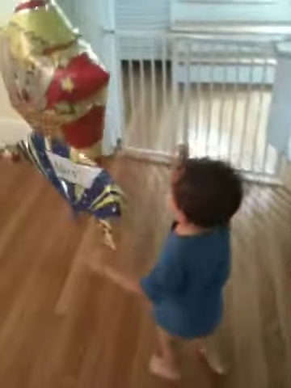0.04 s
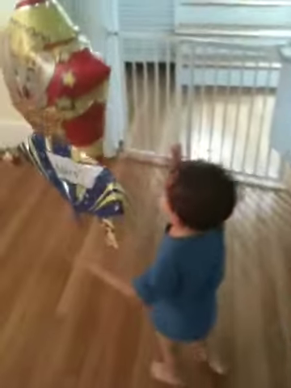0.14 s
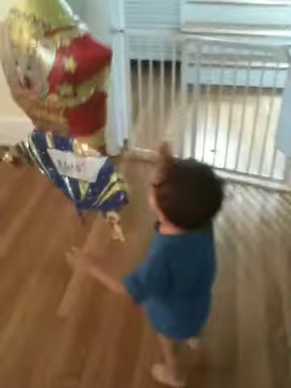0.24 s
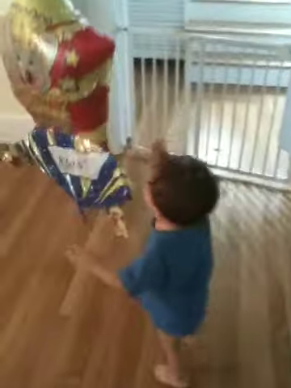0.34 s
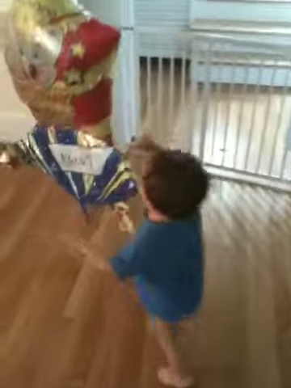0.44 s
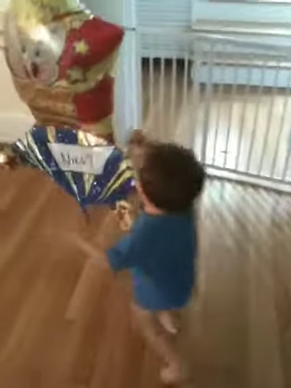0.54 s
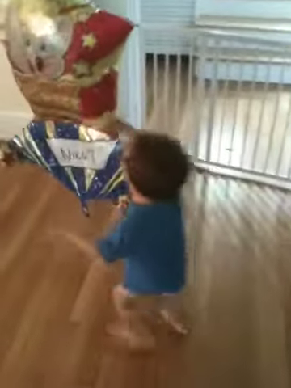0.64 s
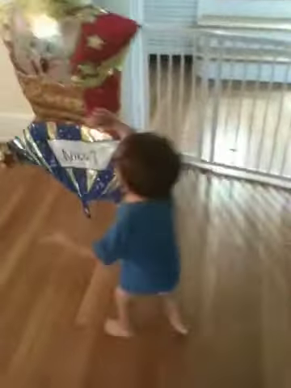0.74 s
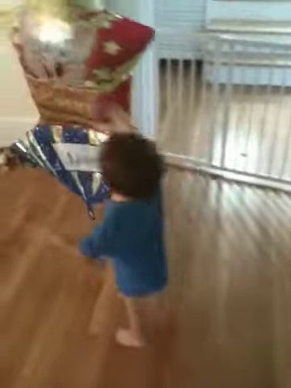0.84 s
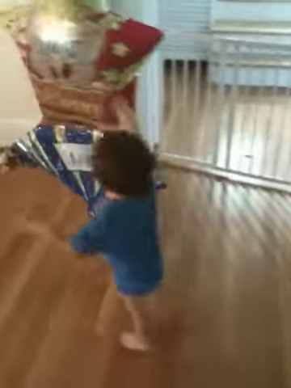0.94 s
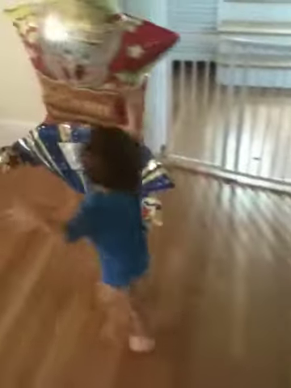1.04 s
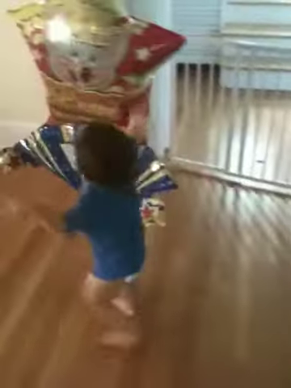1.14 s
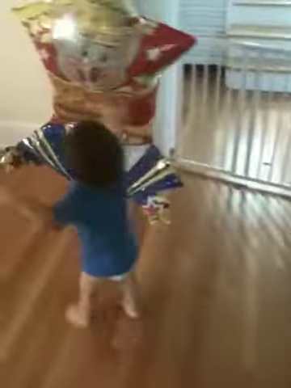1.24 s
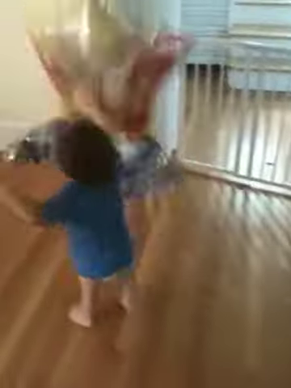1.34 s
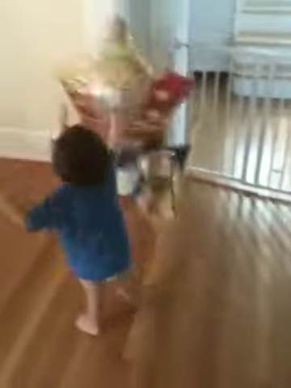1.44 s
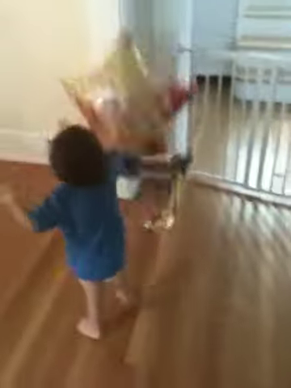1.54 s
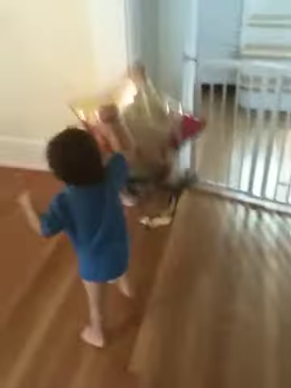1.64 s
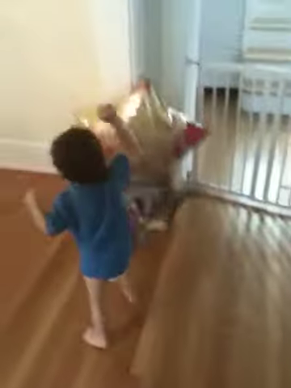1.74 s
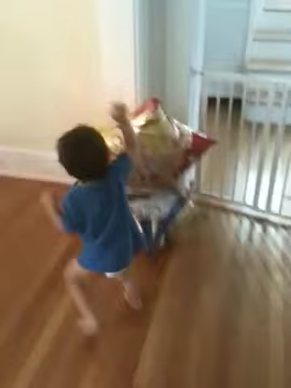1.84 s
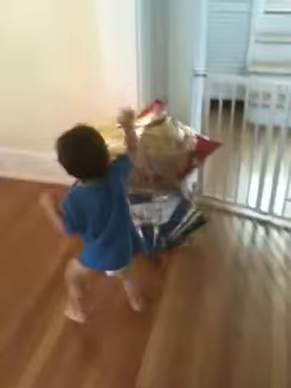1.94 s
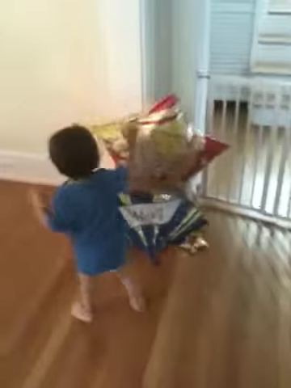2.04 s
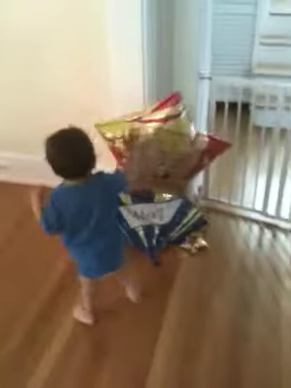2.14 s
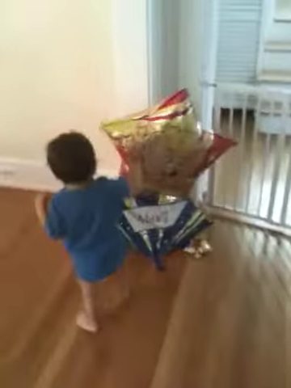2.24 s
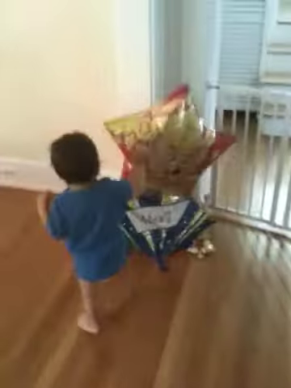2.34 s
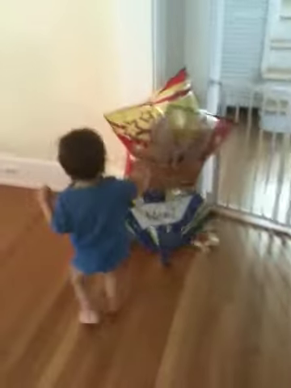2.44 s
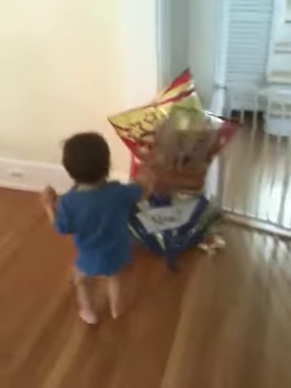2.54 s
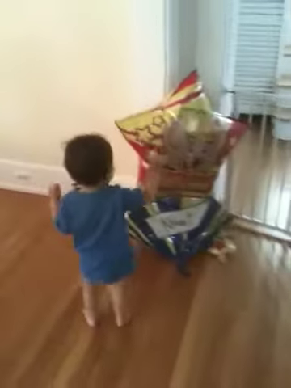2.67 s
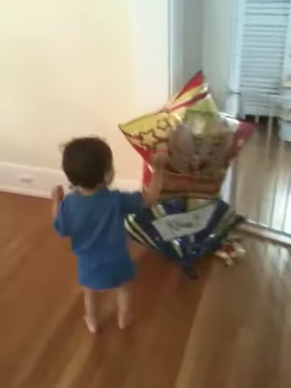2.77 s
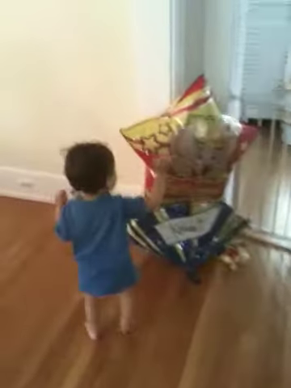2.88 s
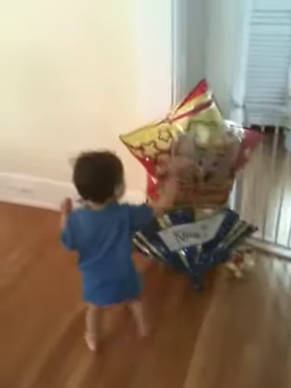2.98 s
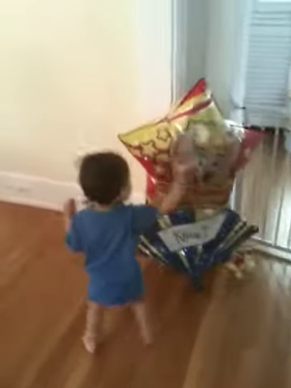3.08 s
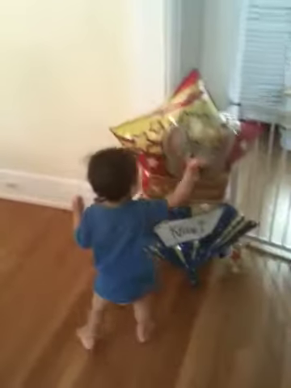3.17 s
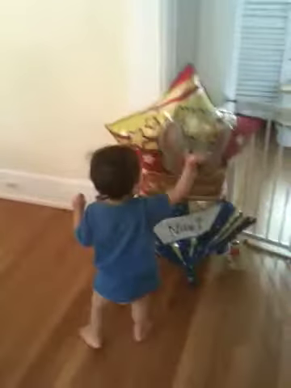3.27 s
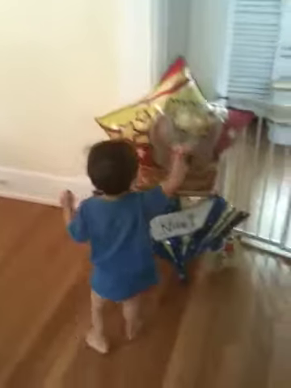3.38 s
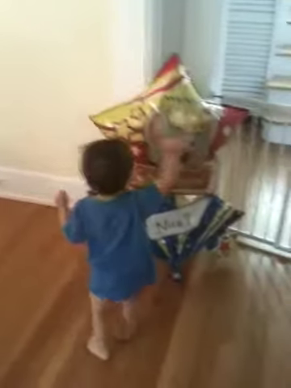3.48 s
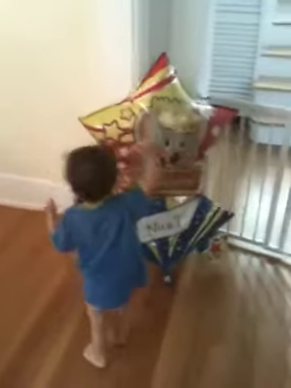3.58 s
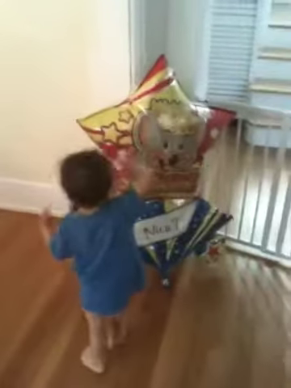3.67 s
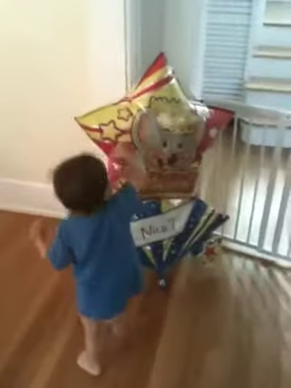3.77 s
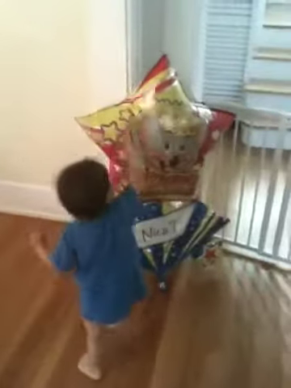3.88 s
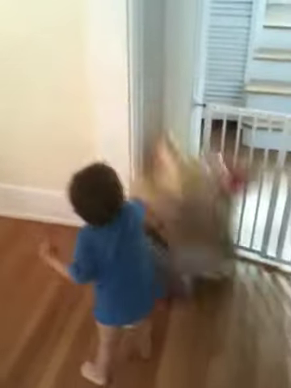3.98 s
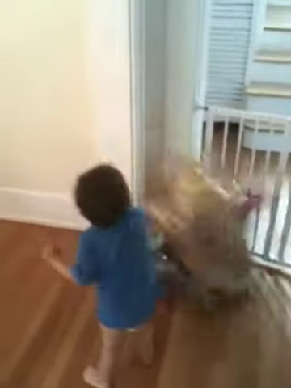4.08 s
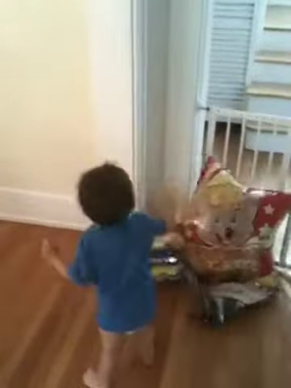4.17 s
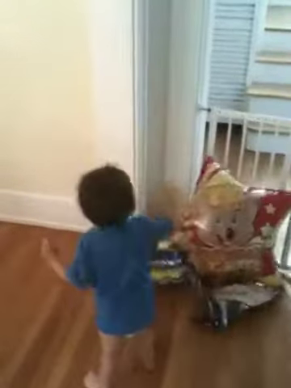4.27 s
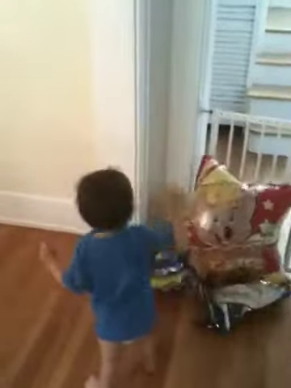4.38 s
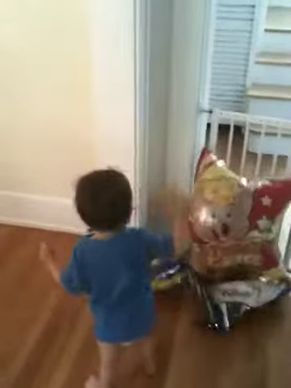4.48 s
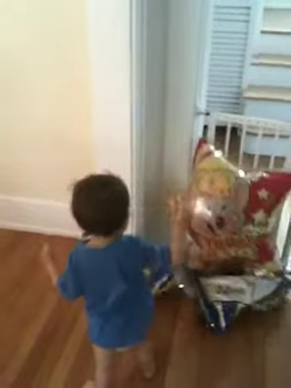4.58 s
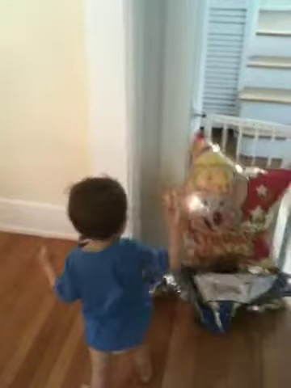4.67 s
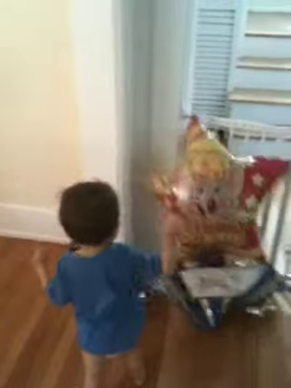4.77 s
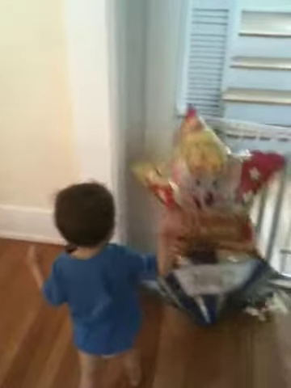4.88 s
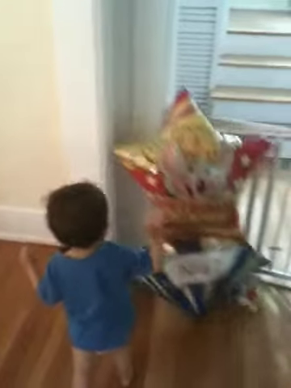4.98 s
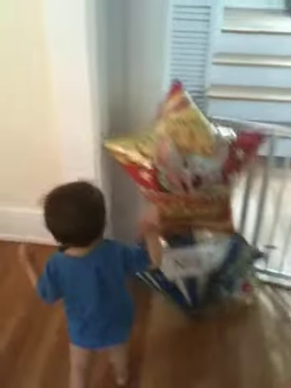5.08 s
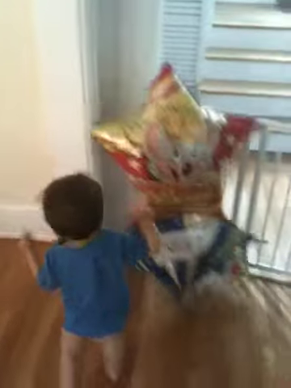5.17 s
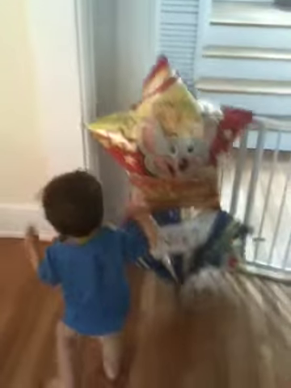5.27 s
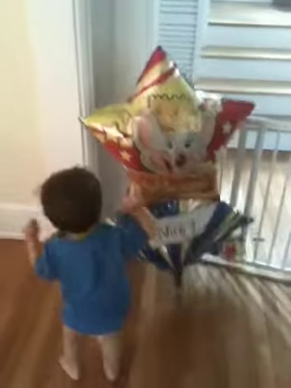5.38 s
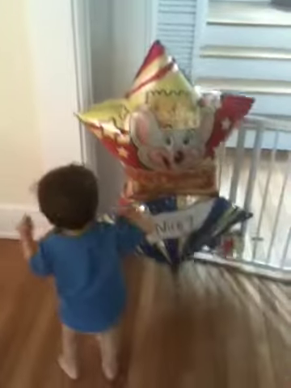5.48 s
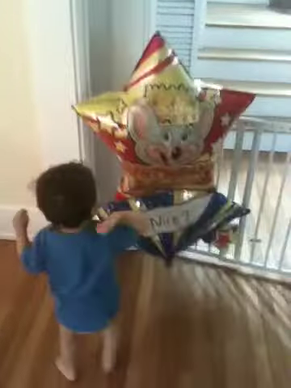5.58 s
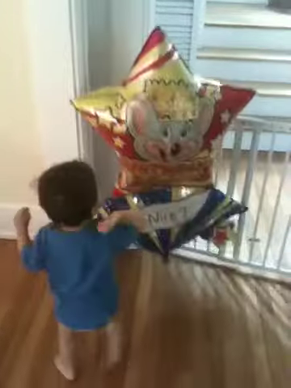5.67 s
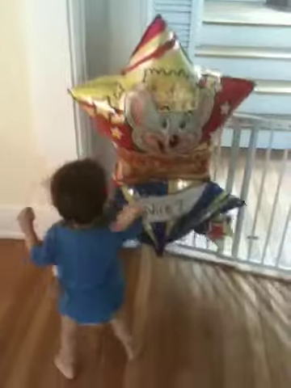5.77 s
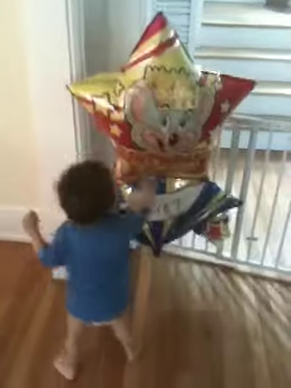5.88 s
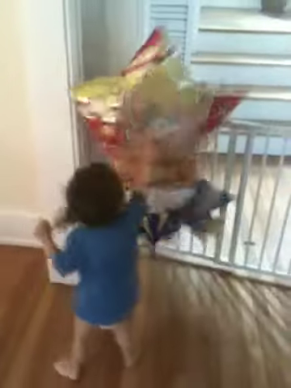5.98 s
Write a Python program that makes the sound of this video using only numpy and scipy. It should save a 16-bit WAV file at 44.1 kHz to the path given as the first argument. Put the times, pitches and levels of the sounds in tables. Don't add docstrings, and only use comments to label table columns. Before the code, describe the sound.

Crinkly foil rustling, finger taps and faint barefoot steps, broken by two bursts of thumping, crackling slaps on a big gas-filled foil balloon indoors.

```python
import sys
import numpy as np
from scipy import signal
from scipy.fft import rfft, irfft
from scipy.io import wavfile

SR = 44100
rng = np.random.default_rng(int(sys.argv[2]) if len(sys.argv) > 2 else 0)


def decibels_to_gain(level_db):
    exponent = np.asarray(level_db, float) / 20
    return 10 ** exponent


def unload_audio(sound):
    columns = np.transpose(np.atleast_2d(sound))
    steps = np.round(np.clip(columns, -1, 1) * 32767)
    wavfile.write(sys.argv[1], SR, steps.astype(np.int16))


N = 265482


def rms_one(x):
    return x / np.sqrt(np.mean(x ** 2) + 1e-20)


def at_hz(points, hz):
    point_hz, value = np.transpose(points)
    return np.interp(np.log(hz), np.log(point_hz), value)


def colour(x, points, size=4096):
    hz = np.maximum(np.arange(size // 2 + 1) * SR / size, 1)
    cepstrum = irfft(np.log(decibels_to_gain(at_hz(points, hz))))
    cepstrum[1:size // 2] *= 2
    cepstrum[size // 2 + 1:] = 0
    response = irfft(np.exp(rfft(cepstrum)))
    response = response / np.sqrt(np.sum(response ** 2))
    return signal.fftconvolve(x, response)[:len(x)]


def resonate(x, hz, width):
    r = np.exp(-np.pi * width / SR)
    gain = (1 - r * r) / 2
    return signal.lfilter([gain, 0, -gain], [1, -2 * r * np.cos(2 * np.pi * hz / SR), r * r], x)


def split(x):
    low = signal.lfilter(*signal.butter(1, 556, fs=SR), x)
    high = signal.lfilter(*signal.butter(1, 4050, "high", fs=SR), x - low)
    return low, x - low - high, high


def snaps(per_s, spread_db):
    sizes = decibels_to_gain(spread_db * np.minimum(rng.exponential(1, N), 4)) * rng.choice([-1, 1], N)
    return rms_one(sizes * (rng.random(N) < per_s / SR))


# start_s, level_db (peak), palm (1 flat palm, 0 fingertips), length_s
BLOWS = [(1.4103, -27, 0.42, 0.012), (1.42, -26, 0.52, 0.016), (1.434, -26.5, .7, 0.014),
         (1.454, -27, .1, 0.015), (1.486, -24.5, 1, 0.0037), (1.526, -34.5, 0.93, 0.019),
         (1.622, -32, 0.3, 0.015), (1.664, -37.5, 0.63, .01), (2.364, -47, .99, 0.0045),
         (2.407, -52.5, 0.84, 0.0099), (3.99, -30, 0.13, 0.016), (3.995, -26.5, 0.5, 0.016),
         (4.012, -24, .99, 0.0073), (4.017, -17.5, 0.79, 0.011), (4.034, -20, 0.29, 0.0045),
         (4.067, -26.5, 0.082, .01), (4.09, -38, 0.59, 0.0068), (4.192, -40, 0.21, 0.01),
         (4.275, -37.5, 0.45, 0.013)]
# pitch_hz, level_db (per Hz)
STRUCK_FOIL = [(35, -67), (60, 4), (175, -5.5), (260, -12.5), (299, -7.5), (477, -1.5), (536, -9),
               (693, -10), (778, -9), (1460, -11.5), (2500, -5.5), (4570, -14), (9860, -13.5), (15700, -22)]
# pitch_hz, width_hz, level_db
CUSHION = [(190, 13, -12.5), (222, 77, 12), (306, 110, 3), (402, 38, -3.5), (574, 133, 5.5), (900, 30, -14),
           (1196, 690, 10.5)]
PALM_THUMP_DB, FINGER_THUMP_DB = -5, -14
PALM_SPARKLE_DB, FINGER_SPARKLE_DB = -27, -2.5
BLOW_RISE_S = 0.0003


def blows():
    strength = np.zeros((3, N))
    for start_s, level_db, palm, length_s in BLOWS:
        thump_db = FINGER_THUMP_DB + palm * (PALM_THUMP_DB - FINGER_THUMP_DB)
        sparkle_db = FINGER_SPARKLE_DB + palm * (PALM_SPARKLE_DB - FINGER_SPARKLE_DB)
        at = round(start_s * SR)
        age = np.arange(min(round((BLOW_RISE_S + 6 * length_s) * SR), N - at)) / SR
        burst = np.minimum(age / BLOW_RISE_S, 1) * np.exp(-np.maximum(age - BLOW_RISE_S, 0) / length_s)
        gains = decibels_to_gain([[level_db + thump_db], [level_db], [level_db + sparkle_db]])
        strength[:, at:at + len(age)] += gains * burst
    crackle = snaps(per_s=7000, spread_db=3.0)
    low = split(crackle * strength[0])[0]
    middle = split(crackle * strength[1])[1]
    high = split(crackle * strength[2])[2]
    ringing = sum(decibels_to_gain(db + 5.5) * resonate(low, hz, width) for hz, width, db in CUSHION)
    return colour(low + ringing + middle + high, STRUCK_FOIL)


# start_s, level_db, held_s, brightness_db
STIRS = [(0.0, -69.5, 0.015, -3), (.45, -63, 0.033, -10), (.8, -69, 0.16, -5), (1.07, -68.5, 0.033, 3),
         (1.41, -45, 0.18, 5.5), (1.759, -58.5, 0.13, 6.5), (1.962, -53, 0.079, 5), (2.31, -61, 0.14, 6.5),
         (2.52, -66, 0.17, 6), (2.84, -73.5, 0.18, 11), (3.1, -66.5, 0.025, 7), (3.36, -69.5, 0.037, 10.5),
         (3.76, -72.5, 0.16, 4.5), (4.0, -41, 0.06, 8.5), (4.64, -56, 0.055, 6), (4.8, -59, 0.092, 10),
         (4.96, -56, 0.049, 6.5), (5.25, -69.5, 0.033, -1), (5.44, -63, 0.23, 5.5), (5.72, -63.5, 0.11, -1)]
# pitch_hz, level_db (per Hz)
CREASED_FOIL = [(76, -80), (130, -42), (153, -55), (169, -3.5), (314, 1), (369, 1.5), (585, -3.5),
                (647, -4), (2530, 0), (4910, -11.5), (12600, -19), (15700, -31.5)]
SWELL_S, SETTLE_S, SETTLE_POWER, SETTLE_DB_PER_S = 0.074, 0.065, 1.075, 3.5
REST_DB, CUSHION_DB = -76.5, 2


def rustle():
    power = np.full((2, N), decibels_to_gain(2 * REST_DB))
    for start_s, level_db, held_s, bright_db in STIRS:
        age = np.maximum(np.arange(N) / SR - start_s, 0)
        late = np.maximum(age - SWELL_S - held_s, 0)
        swell = np.minimum(age / SWELL_S, 1)
        settling = (1 + late / SETTLE_S) ** -SETTLE_POWER * decibels_to_gain(-SETTLE_DB_PER_S * late)
        power += (decibels_to_gain([[level_db], [level_db + bright_db]]) * swell * settling) ** 2
    level, bright = np.sqrt(power)
    low, middle, high = split(snaps(per_s=3500, spread_db=3.0))
    return colour((low * decibels_to_gain(CUSHION_DB) + middle) * level + high * bright, CREASED_FOIL)


# pitch_hz, width_hz, level_db
BOARDS = [(197, 70, 2), (322, 148, 11), (490, 110, -12)]


def touch(out, crackle, start_s, level_db, pitch_hz, thump_db, sparkle_db, length_s):
    at = round(start_s * SR)
    age = np.arange(min(round((.05 + 6 * length_s) * SR), N - at)) / SR
    shape = np.minimum(age / (0.66 * length_s), 1) * np.exp(-age / length_s)
    burst = crackle[at:at + len(age)] * shape
    ring = resonate(burst, pitch_hz, 1.16 * pitch_hz)
    ring = signal.lfilter(*signal.butter(3, 1.83 * pitch_hz, fs=SR), ring)
    tick = resonate(signal.lfilter(*signal.butter(2, 4200, "high", fs=SR), burst), 8800, 3700)
    soft = signal.lfilter(*signal.butter(2, 750, fs=SR), burst)
    knock = sum(decibels_to_gain(db) * resonate(soft, hz, width) for hz, width, db in BOARDS)
    out[0, at:at + len(age)] += decibels_to_gain(level_db + 9.5) * ring + decibels_to_gain(level_db + sparkle_db + 2.5) * tick
    out[1, at:at + len(age)] += decibels_to_gain(level_db + thump_db + 15.5) * knock


# start_s, level_db (peak), length_s
FLICKS = [(0.198, -56.5, 0.0076), (1.377, -59, 0.041), (1.895, -44.5, 0.014), (2.269, -55.5, 0.013),
          (2.616, -58.5, 0.013), (3.014, -63, .012), (3.292, -55, 0.0047), (3.381, -61, 0.013),
          (3.456, -64.5, 0.03), (4.563, -51.5, 0.0057), (5.259, -59, 0.0082), (5.908, -60, 0.0033)]


def flicks(out, crackle):
    for start_s, level_db, length_s in FLICKS:
        touch(out, crackle, start_s, level_db, 2400, -8.5, 0, length_s)


# start_s, level_db (peak), pitch_hz, sparkle_db (re peak), length_s
TAPS = [(0.554, -45, 2340, -28, 0.0027), (0.576, -52, 2700, -18, 0.0056), (0.615, -57, 2590, -12, 0.0069),
        (.779, -48.5, 1990, -15, 0.0058), (.847, -47.5, 1930, -7.5, 0.0047), (0.855, -48, 1060, -8, .012),
        (1.132, -56, 1910, -17, 0.013), (1.923, -49, 2300, -6.5, 0.0039), (2.842, -44, 2840, -11, 0.0029),
        (2.843, -43.5, 940, -17, 0.0068), (3.844, -63, 2300, -14, 0.0072), (4.711, -54, 2480, -12, 0.0043),
        (4.783, -50.5, 2480, -9, .01), (4.984, -45, 1930, -5, 0.0028), (5.061, -49, 1000, -6, 0.011)]


def taps(out, crackle):
    for start_s, level_db, pitch_hz, sparkle_db, length_s in TAPS:
        touch(out, crackle, start_s, level_db, pitch_hz, -11.5, sparkle_db, length_s)


# start_s, level_db (peak), thump_db (heel, re peak), length_s
STEPS = [
    (0.0, -49.5, -6.5, 0.0056),
    (1.103, -57.5, 1.5, 0.011),
    (1.126, -54, -6, 0.012),
    (1.166, -66, 3, 0.015),
    (2.834, -56, 5, 0.0034),
    (2.8404, -53, 15, 0.0016),
    (2.85, -51.5, 8.5, 0.0035),
    (2.862, -51, -15, 0.0072),
    (3.205, -47.5, -12, 0.0043),
    (5.54, -70, -13, 0.011),
]


def steps(out, crackle):
    for start_s, level_db, thump_db, length_s in STEPS:
        touch(out, crackle, start_s, level_db, 1000, thump_db, -14.5, length_s)


def touches():
    out = np.zeros((2, N))
    crackle = snaps(per_s=5000, spread_db=3.5)
    flicks(out, crackle)
    taps(out, crackle)
    steps(out, crackle)
    return out


# pitch_hz, t60_s
HALL_T60 = [(105, 0.36), (150, 0.28), (400, 0.66), (1040, 0.64), (2760, 0.49), (7280, 0.53)]


def hallway(x, fill_s, count=6):
    age = np.arange(round(1.2 * SR)) / SR
    edges = 70 * 2 ** np.arange(0, 8.1, .5)
    echoes = 0
    white = rng.standard_normal((2, count, len(age)))
    for k, (low, high) in enumerate(zip(edges, edges[1:])):
        band_filter = signal.butter(2, [low, high], "band", fs=SR, output="sos")
        band = signal.sosfilt(band_filter, white[k % 2])
        echoes = echoes + band * decibels_to_gain(-60 * age / at_hz(HALL_T60, np.sqrt(low * high)))
    echoes = echoes * (1 - np.exp(-age / fill_s))
    echoes = echoes / np.sqrt(np.sum(echoes ** 2, axis=1, keepdims=True))
    turn = np.arange(N) / (.007 * SR)
    away = (turn - np.arange(count)[:, None] + 1) % count - 1
    share = np.cos(np.pi / 2 * np.clip(away, -1, 1))
    return signal.fftconvolve(x * share, echoes, axes=1).sum(axis=0)[:N]


# pitch_hz, level_db (per Hz)
AIR = [(76, -49), (130, -75), (153, -13.5), (179, -6.5), (314, -9.5), (562, -10.5), (730, -19),
       (967, -15.5), (1160, -21), (2380, -22), (15700, -31.5)]
# pitch_hz, width_hz, level_db
HUM = [(977, 8.5, -83), (2540, 290, -81.5)]


def room_air():
    noise = rng.standard_normal((2, N))
    hum = sum(decibels_to_gain(db) * rms_one(resonate(noise[1], hz, width)) for hz, width, db in HUM)
    return decibels_to_gain(-69) * colour(noise[0], AIR) + hum


def scene():
    struck = decibels_to_gain(-5) * blows()
    creased = decibels_to_gain(-6) * rustle()
    near, knocks = touches()
    sent = decibels_to_gain(3.0) * struck + decibels_to_gain(2.5) * creased + decibels_to_gain(0.5) * near + decibels_to_gain(-3) * knocks
    tail = hallway(sent, fill_s=0.0025)
    return (struck + creased + near + knocks + tail + room_air())[None]


def top_cut(x):
    return signal.sosfilt(signal.butter(12, 15870, fs=SR, output="sos"), x)


# pitch_hz, width_hz, level_db (added)
PORT = (1980, 2000, -19.5)


def record(dry):
    hz, width, db = PORT
    heard = dry + decibels_to_gain(db) * resonate(dry, hz, width)
    heard = signal.sosfilt(signal.butter(5, 163, "high", fs=SR, output="sos"), heard)
    heard = signal.sosfilt(signal.ellip(10, .5, 60, 15780, fs=SR, output="sos"), heard)
    return top_cut(heard)


dry = scene()
out = record(dry)
unload_audio(out)
```